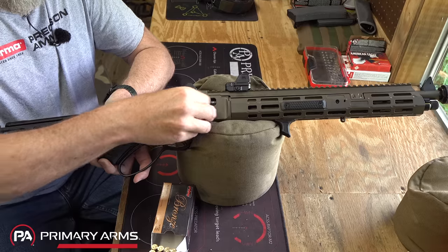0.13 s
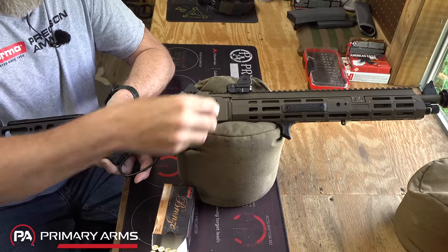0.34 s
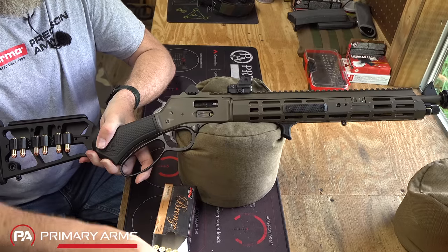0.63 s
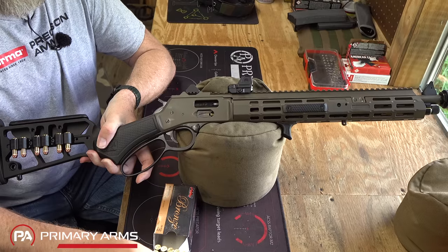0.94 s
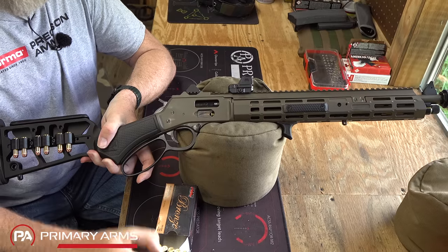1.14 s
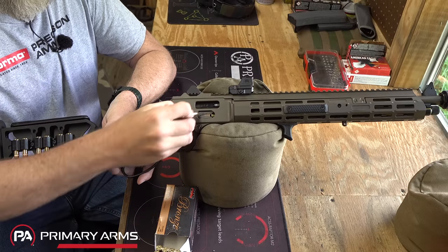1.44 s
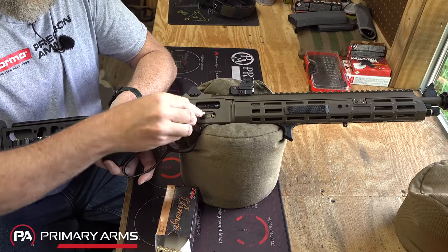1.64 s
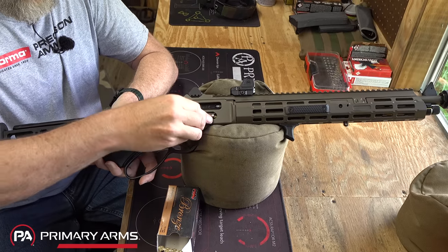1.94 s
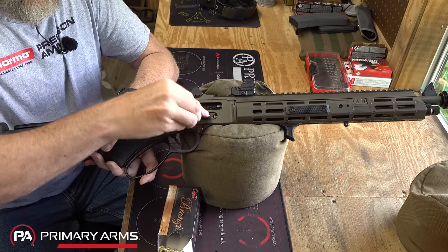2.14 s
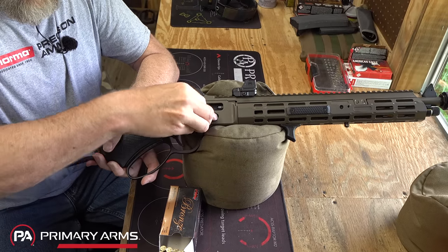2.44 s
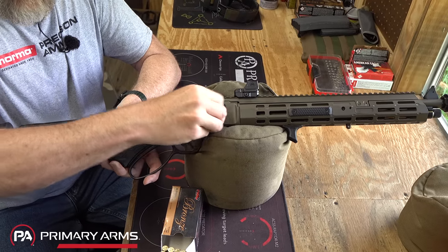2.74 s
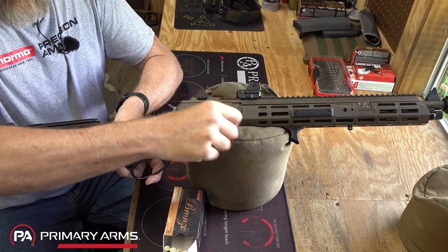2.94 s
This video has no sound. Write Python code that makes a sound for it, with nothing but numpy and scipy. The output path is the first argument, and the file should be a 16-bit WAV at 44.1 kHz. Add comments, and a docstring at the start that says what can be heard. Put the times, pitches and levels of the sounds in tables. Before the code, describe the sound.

Sharp metal clicks and brass scrapes as cartridges are pushed into a rifle.

```python
"""Loading a lever rifle at the bench

One microphone, close to a rifle that lies on a bag on a shooting bench. Cartridges are thumbed through
the sprung loading gate: brass scrapes over steel, the gate clicks and snaps shut, and the pushes thump
the bench. In between, the next round is tugged from its plastic holder. A small wooden room answers
over a low steady hum."""
import sys
import numpy as np
from scipy import signal
from scipy.fft import rfft, irfft, next_fast_len
from scipy.io import wavfile
from scipy.ndimage import uniform_filter1d, map_coordinates

SR = 44100
rng = np.random.default_rng(int(sys.argv[2]) if len(sys.argv) > 2 else 0)


def pcm_store(signal):
    """Save signal as 16-bit PCM."""
    levels = np.round(np.clip(np.atleast_2d(signal), -1, 1) * 32767)
    wavfile.write(sys.argv[1], SR, levels.astype(np.int16).T)


N = 136710

# Modes of the steel receiver and magazine tube. Each row: frequency in Hz, level in dB.
STEEL_MODES = [(530, 2), (1250, -9), (1375, -3.5), (1685, 0), (3015, 2), (3610, -4.5), (4280, 4.5),
               (4490, -2), (7480, 0)]
# Modes of the plastic holder. Each row: frequency in Hz, level in dB.
HOLDER_MODES = [(600, 0), (740, -5.5), (1170, -18), (1480, -3), (1880, 0)]
# Tone of a touch on plastic. Each row: frequency in Hz, gain in dB.
PLASTIC_TONE = [(300, -5), (650, -3), (1900, 4), (11000, -16), (16000, -21)]
STEEL_T60_S, STEEL_RING_DB = 0.023, -9
HOLDER_T60_S, HOLDER_RING_DB = 0.011, -7
FRICTION_SPIKE = 0.84  # unevenness of the friction grains
TOP_HZ = 15900


def gate_clicks():
    """Cartridges tap the receiver and the loading gate snaps shut behind them."""
    # Each row: start in seconds, mid level in dB, lows and treble over it in dB, chatter t60 in seconds.
    clicks = [(0.0394, -54, -4.5, -19, .029), (0.06, -48, -32, -15, 0.016),
              (0.0912, -50.5, -6.5, -21, 0.024), (0.133, -54.5, -2, -23, .016),
              (0.199, -48, -8, -21, 0.022), (0.3293, -51, 8, -4, 0.077), (0.3354, -44.5, 3.5, 8.5, 0.013),
              (0.3434, -36, 0, -1, 0.019), (0.347, -52, -14, -12, 0.028), (1.53, -42, -0.5, -3.5, 0.043),
              (1.9317, -51, 7.5, -7, 0.018), (1.995, -60.5, 6.5, -14, 0.016),
              (2.1902, -53, -2.5, -9, 0.031), (2.4, -55.5, 7, -5.5, 0.029), (2.416, -53, 2.5, -12, 0.037),
              (2.721, -41.5, -6.5, -9, 0.02), (2.7819, -50.5, 1, -8, 0.054), (2.9756, -65, 4.5, -17, 0.076)]
    # Tone of brass striking steel. Each row: frequency in Hz, gain in dB.
    click_tone = [(330, -7.5), (800, -5), (1400, 1), (2400, -0.5), (3200, 7.5), (6000, -4.5), (11500, -10),
                  (16000, -22.5)]
    out = np.zeros(N)
    for start, db, low_db, high_db, t60 in clicks:
        hit = through(contact(t60), body(STEEL_MODES, STEEL_T60_S, STEEL_RING_DB))
        hit = colour(hit, click_tone)
        add(out, start, balanced(hit, db, low_db, high_db, low_hz=2200, high_hz=5400))
    return out


def gate_scrape():
    """Brass scrapes along the gate, the case rim rasps, and the spring sings under a hard push."""
    # Thumb pressure, one list for each of three strokes. Each point: time in seconds, level in dB.
    strokes = [
        [(.05, -65), (.056, -50), (.11, -56.5), (.19, -55.5), (.203, -47), (.228, -52), (.257, -42),
         (.272, -53.5), (.325, -72)],
        [(2.384, -74), (2.399, -48), (2.428, -88)],
        [(2.595, -68), (2.615, -56), (2.66, -78.5), (2.676, -54), (2.71, -53.5), (2.72, -36.5), (2.742, -54),
         (2.795, -56), (2.88, -58), (2.935, -75)],
    ]
    # Tone of brass sliding on steel. Each row: frequency in Hz, gain in dB.
    scrape_tone = [(200, 4), (1000, -4), (3000, 6.5), (5300, 0), (8000, -8.5), (9600, -4.5), (12500, -4),
                   (16000, -15)]
    rasp_edge_hz = 9100
    steel = body(STEEL_MODES, STEEL_T60_S, STEEL_RING_DB)
    scrape = band(friction(steel, scrape_tone), 146, rasp_edge_hz, order=4)
    rasp = amp(-1.5) * band(friction(steel, scrape_tone), rasp_edge_hz, TOP_HZ, order=4)
    spring = amp(1) * singing(hz=4130, width_hz=330)
    push = sum(level(stroke) for stroke in strokes)
    pressure = push / push.max()
    return push.max() * (scrape * pressure + rasp * pressure ** 0.91 + spring * pressure ** 2.56)


def squeal():
    """The last round squeals thinly as it slides in."""
    # Each row: time in seconds, level in dB.
    swell = [(2.6, -78), (2.88, -67), (2.97, -86)]
    return singing(hz=6250, width_hz=290) * level(swell)


def pings():
    # Each row: start in seconds, peak in dB, frequency in Hz, t60 in seconds.
    touches = [(0.708, -61, 11430, 0.033), (0.726, -61, 11000, 0.023), (0.987, -42, 1880, 0.018),
               (1.165, -52, 9040, 0.02), (1.5233, -28.5, 3630, 0.013), (1.531, -46, 542, 0.07),
               (1.932, -34, 2900, 0.012), (2.4669, -34.5, 3520, 0.0042), (3.065, -43, 4900, 0.0039),
               (3.088, -51, 6040, 0.041)]
    out = np.zeros(N)
    for start, db, hz, t60 in touches:
        mode = np.sin(2 * np.pi * hz * moment()) * fade(t60)
        ring = through(burst(t60 / 2), mode)
        add(out, start, amp(db) * ring / np.abs(ring).max())
    return out


def holder_knocks():
    """The plastic holder knocks hollowly, higher in pitch as the round comes free."""
    # Each row: start in seconds, mid level in dB, lows and treble over it in dB, main resonance in Hz.
    knocks = [(0.6999, -47.5, -1.5, -13, 1740), (0.757, -53, 0.5, -14.5, 1790), (0.791, -61, 8, -3.5, 1710),
              (1.104, -60, -3.5, -4, 1850), (1.145, -45, -1, -13.5, 2005)]
    out = np.zeros(N)
    for start, db, low_db, high_db, hz in knocks:
        stretch = hz / HOLDER_MODES[-1][0]
        modes = np.multiply(HOLDER_MODES, [stretch, 1])
        tone = np.multiply(PLASTIC_TONE, [stretch, 1])
        hit = through(contact(chatter_t60=0.044), body(modes, HOLDER_T60_S, HOLDER_RING_DB))
        hit = colour(hit, tone)
        add(out, start, balanced(hit, db, low_db, high_db, low_hz=1000 * stretch, high_hz=2500 * stretch))
    return out


def clip_ticks():
    """A case ticks thinly as it slips from its clip in the holder."""
    # Each row: start in seconds, level in dB.
    ticks = [(0.9188, -56), (0.9434, -60.5), (1.0104, -52), (1.0212, -52.5), (3.086, -56.5)]
    # Tone of a tick. Each row: frequency in Hz, gain in dB.
    tick_tone = [(200, 6), (9000, -1), (13000, 8), (16000, -19)]
    out = np.zeros(N)
    for start, db in ticks:
        tick = colour(contact(chatter_t60=0.041), tick_tone)
        add(out, start, at_level(tick, db))
    return out


def clip_rub():
    """The case rubs in its clip and sounds the holder's modes."""
    # Each row: time in seconds, level in dB.
    swell = [(.92, -70), (1.03, -66), (1.07, -75)]
    plastic = body(HOLDER_MODES, HOLDER_T60_S, HOLDER_RING_DB)
    return friction(plastic, PLASTIC_TONE) * level(swell)


def bench_thumps():
    """Pushes on the rifle swell the bench's one low mode through the bag."""
    # Each row: start in seconds, peak in dB.
    pushes = [(0.13, -49), (0.338, -46), (1.929, -40.5), (2.394, -44.5), (2.604, -41), (2.72, -36.5),
              (2.775, -41)]
    mode_hz, rise_s = 99.1, 0.019
    out, t = np.zeros(N), moment()
    swell = (t / rise_s * np.exp(1 - t / rise_s)) ** 2
    for start, db in pushes:
        add(out, start, amp(db) * swell * np.sin(2 * np.pi * mode_hz * t))
    return out


def stock_bumps():
    """Hands bump the stock: soft thuds of noise an octave wide."""
    # Each row: start in seconds, level in dB as if packed into 15 ms, centre frequency in Hz.
    bumps = [(1.018, -53, 630), (2.83, -53.5, 252), (3.056, -52, 241)]
    out = np.zeros(N)
    for start, db, hz in bumps:
        thud = band(burst(t60=0.15), hz / np.sqrt(2), hz * np.sqrt(2))
        add(out, start, amp(db) * norm(thud) * np.sqrt(0.015 * SR))
    return out


def room(x):
    """The near wooden walls answer; each frequency dies at its own speed."""
    # Each row: frequency in Hz, t60 in seconds.
    decay_times = [(150, 0.15), (4500, 0.24), (15000, 0.16)]
    wall_db, delay_s, build_s = -7.5, 0.00062, 0.0028
    hz, t, spectra = signal.stft(rng.standard_normal(SR // 2), SR, nperseg=256)
    decay = amp(-60 * t / along(decay_times, hz)[:, None])
    tail = signal.istft(spectra * decay, SR, nperseg=256)[1]
    onset = np.clip((np.arange(len(tail)) / SR - delay_s) / build_s, 0, 1)
    return amp(wall_db) * through(x, norm(tail * onset))


def room_tone():
    """A low machine hum over rumble and faint hiss."""
    # Tone of the rumble and hiss. Each row: frequency in Hz, gain in dB.
    floor_tone = [(20, -28), (55, -2.5), (100, -4), (140, -13), (349, -20), (917, -33), (4410, -35.5),
                  (6090, -43)]
    hum_hz, hum_db, floor_db = 73.2, -58.5, -63
    hum = amp(hum_db) * np.sqrt(2) * np.sin(2 * np.pi * hum_hz * np.arange(N) / SR)
    return hum + amp(floor_db) * unit(colour(rng.standard_normal(N), floor_tone))


def body(modes, t60, ring_db):
    """A struck object: the bare contact plus its modes, weighted anew for each touch."""
    t = moment()
    ring = sum(amp(db + rng.normal(0, 0.91)) * np.sin(2 * np.pi * (hz * t + rng.random()))
               for hz, db in modes)
    return amp(ring_db) * norm(ring * fade(t60)) + (t == 0)


def contact(chatter_t60):
    """A snap with a longer chatter of micro-bounces."""
    return burst(t60=0.0057) + amp(8.5) * burst(chatter_t60, spike=1)


def friction(response, tone):
    """Stick-slip grains played through an object, at rms 1."""
    slip_db, slips_per_s = 1.5, 250
    grip = map_coordinates(rng.standard_normal(N // 20), [np.arange(N) * slips_per_s / SR], mode="wrap")
    grains = grit(N, FRICTION_SPIKE) * amp(slip_db * grip)
    return unit(patchy(colour(through(grains, response), tone)))


def patchy(x, depth_db=2.5, size=256):
    """The point of contact wanders, so resonances come and go."""
    spectra = signal.stft(x, nperseg=size)[2]
    drift = uniform_filter1d(rng.standard_normal(spectra.shape), size=5, axis=0)
    drift = uniform_filter1d(drift, size=5, axis=1)
    return signal.istft(spectra * amp(depth_db * unit(drift)), nperseg=size)[1][:N]


def singing(hz, width_hz):
    """Friction in one narrow resonance, at rms 1."""
    return unit(band(grit(N, FRICTION_SPIKE), hz - width_hz / 2, hz + width_hz / 2))


def grit(size, spike):
    """Noise made of micro-impacts, more uneven as spike grows."""
    return rng.standard_normal(size) * np.exp(spike * np.clip(rng.standard_normal(size), -2, 2))


def burst(t60, spike=0):
    """Dying noise of energy 1."""
    return norm(grit(len(moment()), spike) * fade(t60))


def balanced(hit, db, low_db, high_db, low_hz, high_hz):
    """A hit with its mids at db and its lows and treble set relative to them."""
    bands = [(200, low_hz, low_db), (low_hz, high_hz, 0), (high_hz, TOP_HZ, high_db)]
    return sum(at_level(band(hit, lo, hi, order=5), db + offset) for lo, hi, offset in bands)


def at_level(x, db):
    """Scaled so that the first 8 ms have this rms level."""
    return amp(db) * x / np.sqrt(np.mean(x[:int(0.008 * SR)] ** 2))


def colour(x, points, size=8192):
    """Minimum-phase filter with the gain of (Hz, dB) points."""
    gain = amp(along(points, np.fft.rfftfreq(size, 1 / SR)))
    cepstrum = irfft(np.log(gain))
    cepstrum[1:size // 2] *= 2
    cepstrum[size // 2 + 1:] = 0
    return through(x, irfft(np.exp(rfft(cepstrum))))


def band(x, lo_hz, hi_hz, order=2):
    """Causal band-pass."""
    return signal.sosfilt(signal.butter(order, [lo_hz, hi_hz], "band", fs=SR, output="sos"), x)


def through(x, response):
    """x played through an impulse response."""
    return signal.fftconvolve(x, response)[:len(x)]


def add(track, start, sound):
    """Mix a sound into the track at a start in seconds."""
    part = track[round(start * SR):][:len(sound)]
    part += sound[:len(part)]


def moment():
    """The time axis of one short sound, in seconds."""
    return np.arange(SR // 4) / SR


def fade(t60):
    """Decay by 60 dB in t60 seconds."""
    return amp(-60 * moment() / t60)


def level(points):
    """Gain per sample from (seconds, dB) points, silent outside them."""
    return amp(np.interp(np.arange(N) / SR, *np.transpose(points), left=-np.inf, right=-np.inf))


def along(points, hz):
    """(Hz, value) points read on a log axis."""
    point_hz, values = np.transpose(points)
    return np.interp(np.log(hz + 1), np.log(point_hz + 1), values)


def amp(db):
    """Decibels to gain."""
    return 10 ** (np.asarray(db) / 20)


def unit(x):
    """Scaled to rms 1."""
    return x / np.sqrt(np.mean(x ** 2) + 1e-20)


def norm(x):
    """Scaled to energy 1."""
    return x / np.sqrt(np.sum(x ** 2) + 1e-20)


def scene():
    """Close at the bench, in mono; clicks, knocks, pings and sliding each get their own room tail."""
    sources = (gate_clicks(), holder_knocks() + clip_ticks(), pings(),
               gate_scrape() + clip_rub() + squeal())
    handling = sum(x + room(x) for x in sources)
    return (handling + bench_thumps() + stock_bumps() + room_tone())[None]


def record(dry):
    """The microphone passes nothing above TOP_HZ."""
    size = next_fast_len(N + SR // 2)
    passband = np.fft.rfftfreq(size, 1 / SR) < TOP_HZ
    return irfft(rfft(dry, size) * passband, size)[..., :N]


dry = scene()
out = record(dry)
pcm_store(out)
```